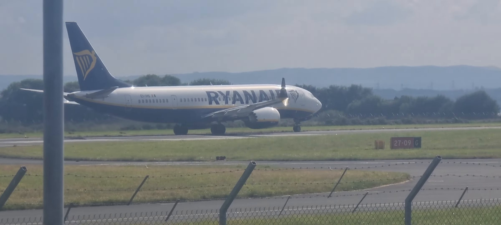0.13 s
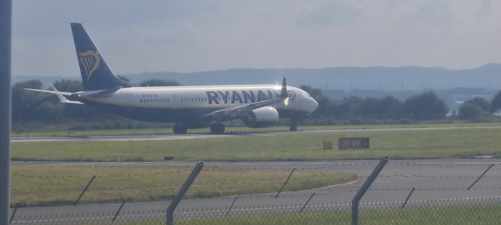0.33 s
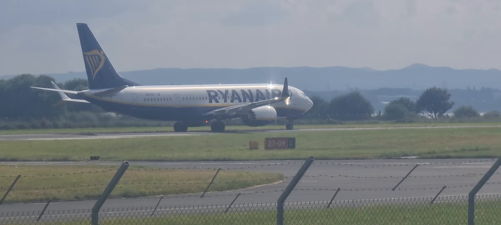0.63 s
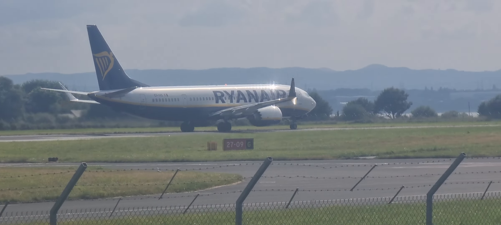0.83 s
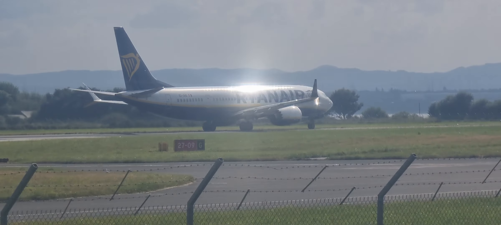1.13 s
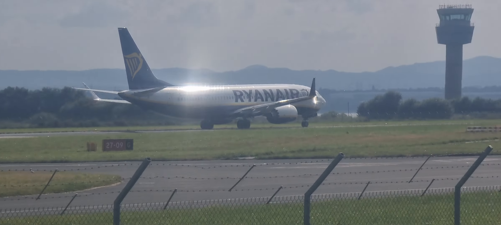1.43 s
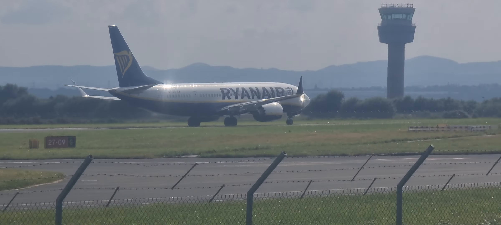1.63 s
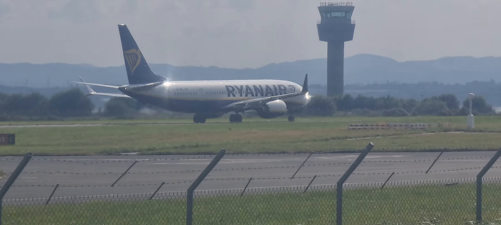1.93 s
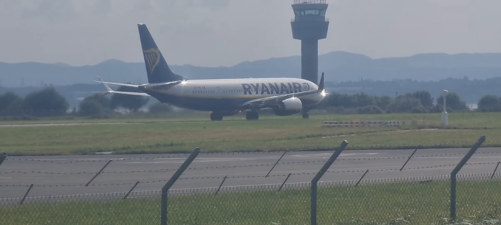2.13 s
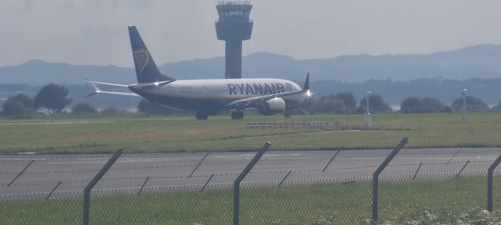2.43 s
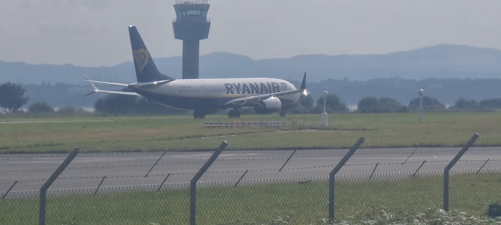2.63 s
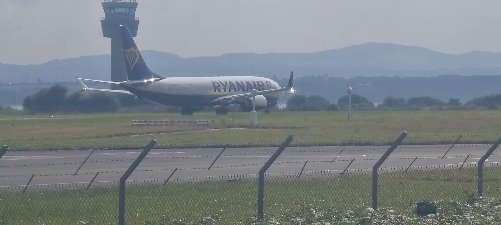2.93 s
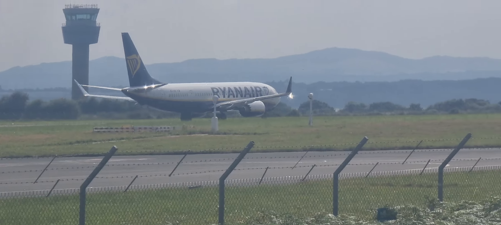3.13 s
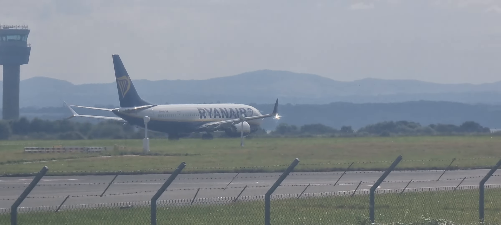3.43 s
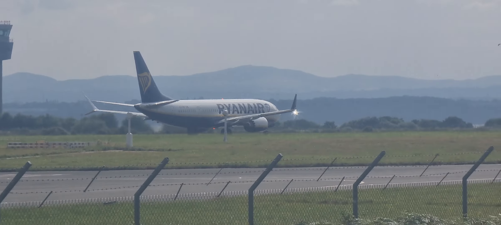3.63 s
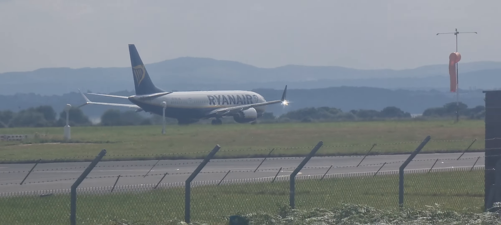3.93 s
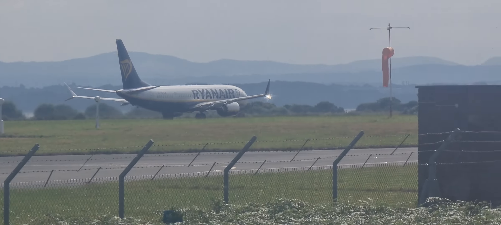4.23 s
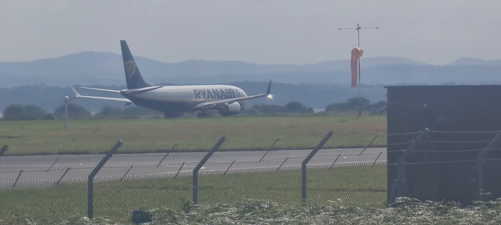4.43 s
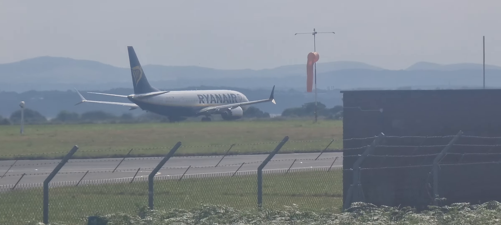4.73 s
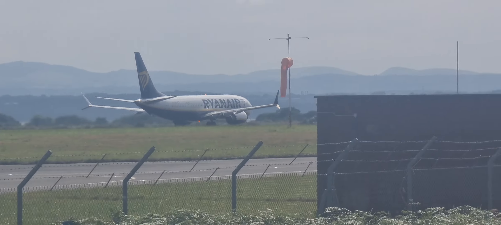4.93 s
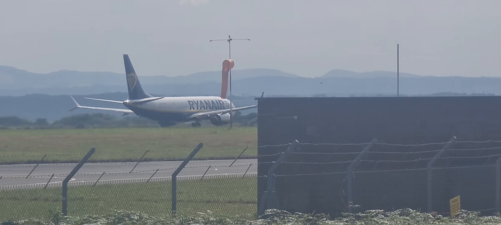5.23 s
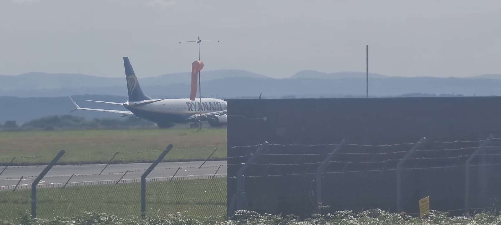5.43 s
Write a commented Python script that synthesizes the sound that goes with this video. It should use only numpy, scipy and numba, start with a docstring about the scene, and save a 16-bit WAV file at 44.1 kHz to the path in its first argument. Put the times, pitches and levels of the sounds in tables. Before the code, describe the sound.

Heavy throbbing jet roar with a faint wavering whine recedes across an open airfield, interrupted by three button clicks and dull handling thuds.

```python
"""A deep surging jet rumble and roar: an airliner at takeoff thrust rolls away, heard on a hand-held camera.
Shaped noise makes the rumble and fills fixed resonances for the roar; two sagging sines make the fan whine.
A finger works a button three times (noise clicks over damped swings), soft thuds shake the housing
as swings that sag in pitch, and thin high noise rustles behind. A limiter eases the peaks down."""
import sys
import numpy as np
from scipy import signal
from scipy.fft import irfft
from scipy.io import wavfile
from scipy.ndimage import uniform_filter1d, minimum_filter1d
from numba import njit

SR = 44100
rng = np.random.default_rng(int(sys.argv[2]) if len(sys.argv) > 2 else 0)


def dump(signal):
    """Clip the signal to [-1, 1] and save it as 16-bit WAV at the path in sys.argv[1]."""
    limited = np.clip(np.atleast_2d(signal).T, -1, 1)
    pcm = np.round(limited * 32767).astype(np.int16)
    wavfile.write(sys.argv[1], SR, pcm)


N = 246519
TIME = np.arange(N) / SR  # s
HZ = np.arange(2 ** 17 + 1) * SR / 2 ** 18  # frequency of each spectrum bin


def undb(db):
    """Decibels to gain."""
    return 10 ** (np.asarray(db) / 20)


def unit(x):
    """Scale to rms 1."""
    return x / np.sqrt(np.mean(x ** 2))


def curves(table):
    """Every column of a table after the first, joined by straight lines in time."""
    start_s, *columns = np.transpose(table)
    return [np.interp(TIME, start_s, column) for column in columns]


def opposed(left, right):
    """A value for each microphone, as a column that spreads over time."""
    return np.array([[left], [right]])


def walk(rate):
    """Random levels held 1 / rate s and slewed twice; rms 1."""
    hold = int(SR / rate)
    held = np.repeat(rng.standard_normal(N // hold + 1), hold)[:N]
    return unit(uniform_filter1d(uniform_filter1d(held, hold), hold))


def noise(shape, lead=0., alike=1.):
    """Noise of a given spectrum at both microphones: the right one leads (rad), and a part is unrelated."""
    on = shape > shape.max() * 1e-5  # skip the silent bins
    re, im = rng.standard_normal((2, 3, len(HZ[on])))
    shared, left, right = re + 1j * im
    share = np.clip(alike, 0, 1)
    turn = np.exp(1j * (lead + 0 * HZ)[on])
    pair = np.zeros((2, len(HZ)), complex)
    pair[0, on] = np.sqrt(share) * shared + np.sqrt(1 - share) * left
    pair[1, on] = np.sqrt(share) * shared * turn + np.sqrt(1 - share) * right
    return unit(irfft(pair * shape)[:, :N])


def ring(s, hz, t60, rise_s, end_hz=None, glide_s=0.0072):
    """A damped swing that starts at s, builds over rise_s and may sag in pitch; peak 1."""
    t = np.clip(TIME - s, 0, 1)
    end_hz = end_hz or hz
    turns = end_hz * t + (hz - end_hz) * glide_s * (1 - np.exp(-t / glide_s))
    build = 1 - np.exp(-t / rise_s)
    decay = np.exp(-np.log(1000) * t / t60)
    swing = np.sin(2 * np.pi * turns) * build * decay
    return swing / np.abs(swing).max()


def rumble():
    """Large eddies of the jet: a deep band in two parts that surge on their own, almost alike at both sides."""
    # surges of the two parts: start_s [s], deep_db [dB], upper_db [dB]
    surges = [(0.04, -12.5, -9), (0.2, -18, -4.5), (0.34, -3.5, -12), (0.41, -16, -4.5), (0.58, -0.5, -14),
              (0.65, -3.5, -17), (0.71, -14.5, -3.5), (0.91, -10, -14), (0.96, -18, -4.5),
              (1.24, -7.5, -14), (1.31, -26, -14), (1.59, -9, -9.5), (1.65, -14.5, -12.5), (1.7, -20, -8),
              (1.77, -7, -12.5), (1.83, -12.5, -5.5), (1.88, -12, -12.5), (1.96, -4, -6),
              (2.04, -21, -17.5), (2.11, -1.5, -8.5), (2.29, -15, -25), (2.39, -2.5, -8.5),
              (2.44, -11.5, -13), (2.711, -6.5, -15.5), (2.81, -15.5, -12.5), (2.88, -5.5, -12.5),
              (2.97, -14.5, -10.5), (3.02, -5.5, -22), (3.21, -14, -10.5), (3.27, -8, -13.5),
              (3.33, -6, -21), (3.38, -17, -22), (3.49, -9.5, -10), (3.63, -13, -23), (3.74, -20, -25.5),
              (3.82, -10.5, -16.5), (3.931, -14.5, -11), (4.2, -3.5, -19), (4.38, -13.5, -15),
              (4.57, -13.5, -21.5), (4.68, -18, -16), (4.83, -9, -25), (4.91, -22, -21.0), (5.07, -8, -27),
              (5.23, -18, -21.5), (5.55, -16.5, -21.5)]
    # relative spectrum of the whole band: pitch_hz [Hz], level_db [dB]
    rumble_colour = [(10, -39), (22, -18), (33, -11.5), (40, -5.5), (50, -2.5), (60, 0), (75, 0), (90, -3),
                     (102, -3), (112, -9), (130, -20.5), (150, -32), (200, -70)]
    split_hz, throb_db = 80, 1.27
    pitch_hz, colour_db = np.transpose(rumble_colour)
    shape = undb(np.interp(np.log(HZ + 1), np.log(pitch_hz), colour_db, left=-120, right=-120))
    upper = 1 / (1 + (split_hz / (HZ + 1)) ** 14)  # share of the power
    span = int(.06 * SR)
    out = 0
    for part, level_db in zip((1 - upper, upper), curves(surges)):
        band = noise(shape * np.sqrt(part), lead=-0.27, alike=0.99)
        # the slow chance swells of so narrow a band are partly evened out
        swell = uniform_filter1d(uniform_filter1d(np.mean(band ** 2, axis=0), span), span)
        evened = unit(band / (swell + .05) ** 0.21)
        out = out + undb(level_db + throb_db * walk(12)) * evened
    return out * undb(opposed(-.4, .4))


def roar():
    """Jet mixing noise fills each resonance; air turbulence makes neighbours swell together and each flicker."""
    # main roar over time: start_s [s], level_db [dB], low_db [dB above the main roar], tilt_db [dB per octave]
    roar_curve = [(0, -12.5, -2, -1.5), (.12, -12.5, 0, -7.5), (.3, -12, -1, -7), (.55, -11, -4, -4.5),
                  (.85, -12, -1, -1.5), (1.05, -15, -3.5, 1), (1.2, -14, -1.5, -0.5), (1.33, -19, -1, 2.5),
                  (1.47, -12.5, -4.5, -4.5), (1.58, -13.5, -3.5, -3), (1.7, -14.5, -5, 0),
                  (2.05, -14.5, -7, -3), (2.19, -13.5, -8, 3), (2.34, -12.5, -9, 3), (2.42, -16, -7, -2.5),
                  (2.75, -17, -7, 2.5), (3.05, -17, -5, 3), (3.3, -19, -4.5, 2.5), (3.44, -18.5, -6.5, 2.5),
                  (3.54, -20, -8, 3.5), (3.65, -24, -4, 3), (3.95, -21.5, -6, 5.5), (4.2, -23, -2.5, 4),
                  (4.5, -25, -4, 1.5), (4.95, -26.5, -2.5, 1.5), (5.08, -24.5, -5.5, 2.5),
                  (5.3, -26, -5.5, 0.5), (5.59, -27.5, -2.5, 0.5)]
    # hiss over time: start_s [s], level_db [dB]
    hiss_curve = [(0, -28.5), (.15, -27), (.38, -27), (.43, -30), (.49, -21), (.54, -22), (.575, -29.5),
                  (.63, -25), (.83, -27), (.87, -28), (.93, -22.5), (1.03, -28), (1.07, -26), (1.13, -20),
                  (1.19, -24.5), (1.3, -34), (1.4, -28), (1.59, -28.5), (1.63, -22.5), (1.68, -26),
                  (1.85, -27.5), (1.96, -30), (2.06, -29.5), (2.2, -28.5), (2.42, -26.5), (2.7, -29.5),
                  (3.0, -29), (3.4, -31.5), (3.6, -32.5), (3.7, -37), (4.0, -31.5), (4.22, -29.5),
                  (4.36, -35), (4.44, -38.5), (4.96, -37), (5.01, -31), (5.1, -33.5), (5.3, -40.5),
                  (5.59, -40.5)]
    # resonances on the way in, levels relative within each range:
    # pitch_hz [Hz], width_hz [Hz], left_db [dB], right_db [dB]
    resonances = [(112, 175, -22.3, -23.3), (268, 184, -27.7, -27.0), (376, 117, -30.1, -29.5),
                  (472, 104, -48.0, -35.6), (586, 100, -30.4, -41.0), (745, 230, -19.4, -25.0),
                  (903, 250, -29.3, -27.8), (1029, 96, -26.6, -32.5), (1125, 176, -26.5, -36.1),
                  (1280, 195, -22.4, -26.5), (1528, 124, -35.1, -32.6), (1630, 130, -31.2, -33.2),
                  (1730, 170, -34.7, -41.9), (1930, 266, -46.8, -50.6), (2222, 111, -37.2, -45.0),
                  (2490, 420, -31.6, -36.9), (2710, 238, -38.1, -36.0), (2932, 234, -36.2, -34.5),
                  (3224, 178, -53.7, -43.9), (3535, 200, -52.8, -36.4), (3903, 323, -49.3, -36.7),
                  (4095, 259, -48.0, -33.2), (4417, 199, -60.2, -50.5), (4562, 155, -61.7, -52.5),
                  (4856, 352, -57.0, -39.4), (5185, 553, -54.1, -43.8), (5457, 333, -55.9, -44.4),
                  (5963, 871, -64.3, -47.8), (6700, 715, -69.2, -57.8), (7200, 641, -86.1, -64.4)]
    # how the right microphone leads in each resonance: lead_rad [rad at the centre], lead_ms [ms across it]
    leads = [(-0.23, 0.15), (-0.13, -0.11), (-0.01, 0.49), (-0.63, 0.23), (-0.04, 0.97), (0.42, 0.73),
             (0.58, -0.74), (0.26, 1.06), (0.91, 1.07), (1.22, -0.38), (1.76, -1.75), (1.24, 0.11),
             (1.6, 0.75), (-3.06, 1.32), (-1.16, -0.6), (-3.06, -0.81), (2.28, -0.55), (1.09, -1.0),
             (-2.08, -0.96), (-0.0, 0.74), (2.07, -0.28), (1.94, 0.13), (0.18, 0.23), (-2.84, 0.14),
             (0.03, 0.62), (1.09, 0.47), (1.84, 0.41), (-2.7, 0.71), (0.87, 0.19), (2.87, 0.92)]
    # extra swells of five resonances: start_s [s], then a swell_db [dB] for each pitch in swelling_hz
    swelling = [(0, 1.5, 1.5, -7, 1.5, 0.5), (0.499, 3, 0, -3.5, 0, 1), (.9, -2.5, 1, 2, 2, 0.5),
                (1.13, -0.5, -1, -0.5, 0.5, 3), (1.6, -2, -4, -3, -1.5, -2.5), (2.3, 1, -8, 5, 0.5, 0),
                (2.9, 1.5, -5.5, 5.5, 1, 0.5), (3.3, 3.5, 0.5, -0.5, 2, 0), (3.7, 0, -1, -1, -1, -2),
                (4.4, 0.5, 4.5, -2, -2.5, 0), (5.049, 1.5, 3, 1, 3, 1), (5.59, -1.5, 1, -1, -1, 0)]
    # those five resonances: pitch_hz [Hz]
    swelling_hz = (268, 586, 2222, 2490, 2932)
    # what both microphones have in common: pitch_hz [Hz], share [0-1 of the power]
    common_share = [(1200, .975), (2300, .86), (3000, .96), (4200, .97), (6000, .72)]
    low_hz, hiss_hz = 500, 1900  # low roar up to the first, hiss above the second
    pivots_hz = [300, 900, 3300]  # where the tilts of low roar, main roar and hiss turn
    low_tilt_per_s = 1  # dB per octave: the bottom of the low roar fades first
    hiss_tilt_db, hiss_tilt_per_s = 1.5, -0.44  # dB per octave: the hiss dulls with distance
    swell_tilt = -0.53  # dB per octave for each dB of hiss swell: swells are darker

    main_db, low_db, tilt_db = curves(roar_curve)
    hiss_db = curves(hiss_curve)[0]
    extra_db = dict(zip(swelling_hz, curves(swelling)))
    swell_db = hiss_db - uniform_filter1d(hiss_db, int(.7 * SR))
    levels_db = [main_db + low_db + 1.5 * walk(17), main_db + 1.18 * walk(14), hiss_db + 1.4 * walk(18)]
    low_tilt = low_tilt_per_s * (TIME - 1)
    hiss_tilt = hiss_tilt_db + hiss_tilt_per_s * TIME + swell_tilt * swell_db
    tilts_db = [low_tilt, tilt_db, hiss_tilt]
    ranges = [0, 0, 0]
    for (hz, width_hz, left_db, right_db), (lead_rad, lead_ms) in zip(resonances, leads):
        group = int(hz > low_hz) + int(hz > hiss_hz)
        shape = 1 / (1 + ((HZ - hz) / width_hz) ** 2) ** 3
        turn = lead_rad + 2 * np.pi * (HZ - hz) * lead_ms / 1000
        flicker_db = 1.0 * walk(8) + 0.53 * walk(1.7)
        own_db = flicker_db + tilts_db[group] * np.log2(hz / pivots_hz[group]) + extra_db.get(hz, 0)
        alike = np.interp(hz, *np.transpose(common_share))
        ranges[group] += noise(shape, turn, alike) * undb(own_db + opposed(left_db, right_db))
    out = 0
    for band, level_db in zip(ranges, levels_db):
        mid_rms = np.sqrt(np.mean(band.mean(axis=0) ** 2))
        out = out + band / mid_rms * undb(level_db)
    return out


def fan():
    """The fan tone and its octave sink as the aircraft gathers speed away, scintillating in the air."""
    # rms of the tone over time: start_s [s], level_db [dB]
    fan_curve = [(0, -42), (.8, -40.5), (1.8, -24.5), (2.7, -44), (3.4, -28), (3.7, -54.5), (4.6, -46),
                 (5.1, -34), (5.59, -38)]
    fan_hz, sag_hz_per_s = 1051, 8.8
    tone_db = curves(fan_curve)[0] + 0.66 * walk(30)
    octave_db = -48.5 - 3 * TIME + 2.2 * walk(39)
    phase = 2 * np.pi * np.cumsum(fan_hz - sag_hz_per_s * TIME) / SR
    # each side has its own level and phase
    tone = undb(tone_db + opposed(2.5, -2.5)) * np.sin(phase + opposed(0, .3))
    octave = undb(octave_db + opposed(4.5, -2.5)) * np.sin(2 * phase + opposed(0, -2.5))
    return np.sqrt(2) * (tone + octave)


def tick(s, length_s, top_hz):
    """A short burst of noise that rises softly, band-passed from 1500 Hz to top_hz."""
    t = np.arange(1024) / SR
    envelope = t / length_s * np.exp(1 - t / length_s)
    mid, side = envelope * rng.standard_normal((2, len(t)))
    burst = mid + .3 * side * opposed(1, -1)
    band = signal.butter(2, [1500 / SR * 2, top_hz / SR * 2], "bandpass")
    out, start = np.zeros((2, N)), int(s * SR)
    out[:, start:start + len(t)] = signal.lfilter(*band, burst)
    return out


def button():
    """Each press clicks, knocks the shell and thumps the housing; letting go rattles faintly over brief scrapes."""
    # presses: start_s [s], click_db [dB], thump_db [dB], thump_hz [Hz]
    presses = [(1.233, -25, 9, 65.5), (2.1228, -24, 12, 58), (3.5031, -35, 11.5, 58)]
    # ticks as the button lets go: start_s [s], level_db [dB], clack_db [dB of a duller clack, added to level_db]
    release_ticks = [(1.3768, -43, 4), (1.3834, -46, 4), (1.3885, -40.5, 6), (2.2206, -48, 5),
                     (2.2303, -45, 1), (2.2374, -46, 4), (2.2444, -46, 4), (2.2580, -46, 12),
                     (3.6321, -42, 0), (3.6404, -43, 4), (3.6485, -47, 6), (3.6530, -46, 10),
                     (3.6578, -44.5, 25.5)]
    out = 0
    for s, click_db, thump_db, thump_hz in presses:
        click = undb(click_db + opposed(4, -4)) * tick(s, 0.00071, top_hz=6000)
        left_knock = ring(s, 770, 0.016, 0.0003)
        right_knock = ring(s - .0006, 400, 0.014, 0.00027)
        knock = undb(-7.0) * np.array([left_knock, right_knock])
        thump = undb(thump_db) * ring(s + 0.002, thump_hz, 0.057, 0.0096)
        out = out + click + knock - thump
    for s, level_db, clack_db in release_ticks:
        pan_db = 3.5 + 1.5 * rng.standard_normal()  # left over right
        gain = undb(level_db + opposed(pan_db, -pan_db) / 2)
        bright = undb(2.5) * tick(s, 0.00072, top_hz=10900)
        scrape = undb(-7.0) * tick(s - .006, 0.0047, top_hz=9000)
        clack = undb(clack_db) * tick(s, 0.00039, top_hz=5470)
        out = out + gain * (bright + scrape + clack)
    return out


def thuds():
    """Dull bumps on the housing that sag in pitch, a little different at the two microphones."""
    # soft thuds: start_s [s], level_db [dB], start_hz [Hz], t60_s [s]
    bumps = [(4.5271, -0.5, 270, 0.048), (4.676, -1.5, 135, 0.068), (4.696, -4, 113, 0.048),
             (4.711, -3, 110, 0.027), (4.728, 0, 110, 0.036), (5.222, -10.5, 240, 0.046)]
    end_hz, side_db = 74, -5.5
    out = 0
    for s, level_db, start_hz, t60_s in bumps:
        mid = ring(s, start_hz, t60_s, 0.0065, end_hz)
        late = ring(s + .002, start_hz, t60_s, 0.0065, end_hz)
        out = out - undb(level_db) * (mid + undb(side_db) * late * opposed(1, -1))
    return out


def rustle():
    """Thin noise above 9.5 kHz, much alike at both microphones, wavering as it fades."""
    mid, left, right = rng.standard_normal((3, N))
    pair = mid + .3 * np.array([left, right])
    thin = unit(signal.lfilter(*signal.butter(2, 9500 / SR * 2, "highpass"), pair))
    level_db = -75 - 1.1 * TIME + 1.5 * walk(2) + 1.5 * walk(10)
    return undb(level_db) * thin


def scene():
    """The aircraft, the handling sounds and the rustle."""
    return rumble() + roar() + fan() + button() + thuds() + rustle()


@njit
def recover(gain, step):
    """The gain drops at once and creeps back."""
    out, g = np.empty(len(gain)), 1.
    for i in range(len(gain)):
        g = min(gain[i], g + (1 - g) * step)
        out[i] = g
    return out


def record(dry):
    """A look-ahead limiter on both channels together, slow to let go after an overload; then the top is cut."""
    ceiling, limit_share = .84, .88  # full scale; share of each overshoot in dB that is asked back
    release_s, slow_release_s = 0.0079, 0.042
    overload_db, overshoot = 3.5, 1.74  # need beyond this many dB pulls the gain further down, for longer
    ahead = int(0.0032 * SR)
    peak = np.abs(dry).max(axis=0) + 1e-9
    need = minimum_filter1d(ceiling / peak, ahead) ** limit_share
    overload = np.minimum(1, need * undb(overload_db)) ** overshoot
    slow = recover(overload, 1 / (slow_release_s * SR))
    fast = recover(np.minimum(1, need / slow), 1 / (release_s * SR))
    gain = uniform_filter1d(slow * fast, ahead)
    top_cut = signal.ellip(8, .2, 70, 15700, fs=SR, output="sos")
    return signal.sosfilt(top_cut, dry * gain)


dry = scene()
out = record(dry)
dump(out)
```